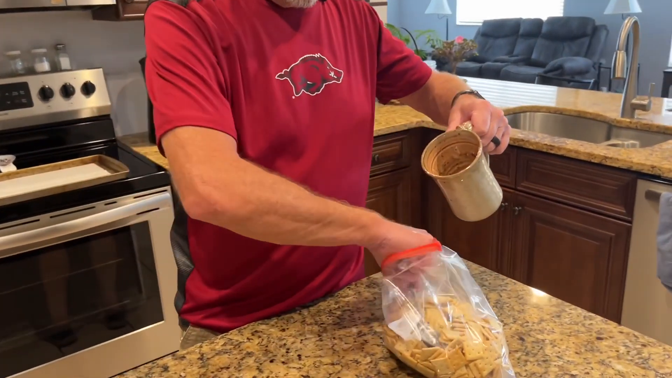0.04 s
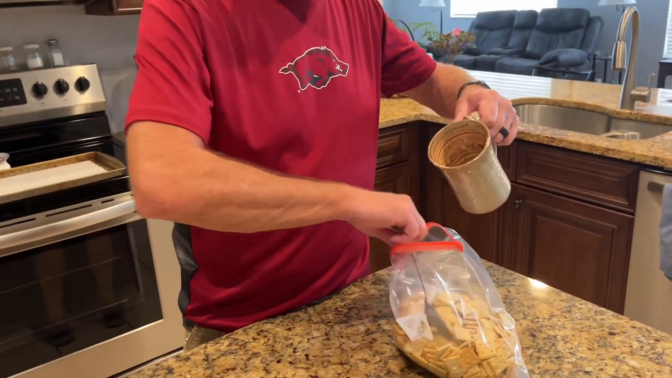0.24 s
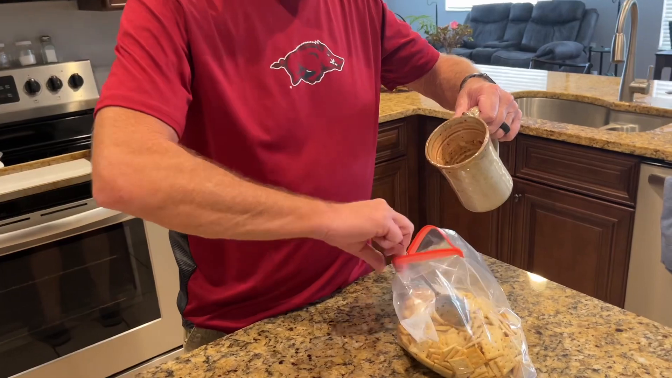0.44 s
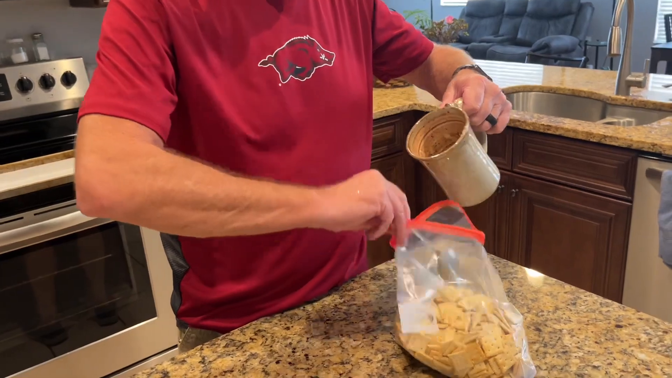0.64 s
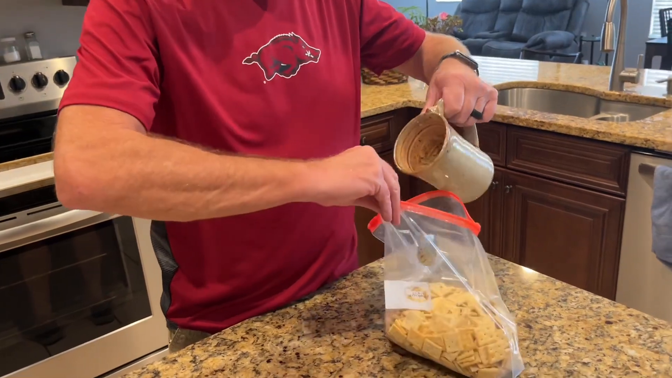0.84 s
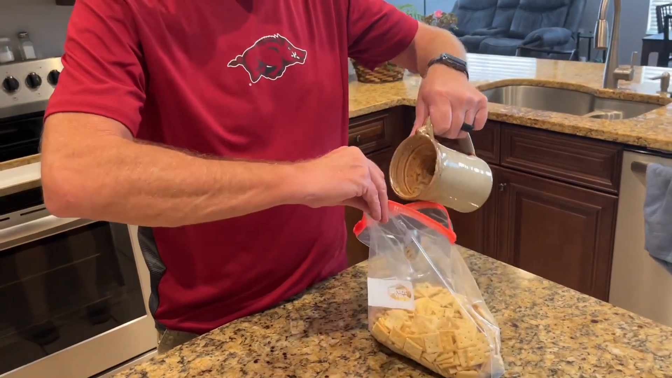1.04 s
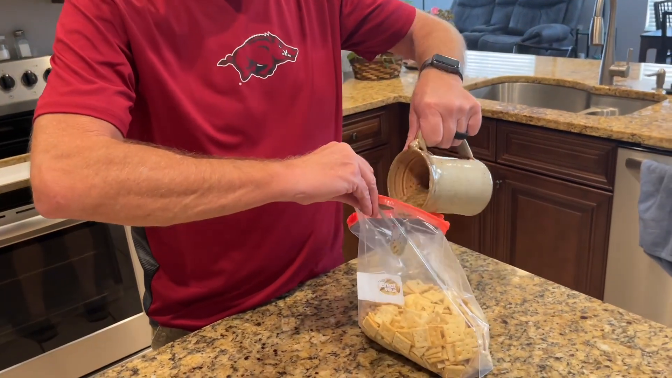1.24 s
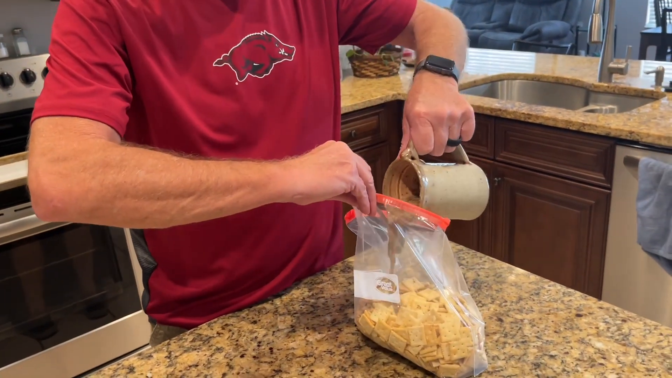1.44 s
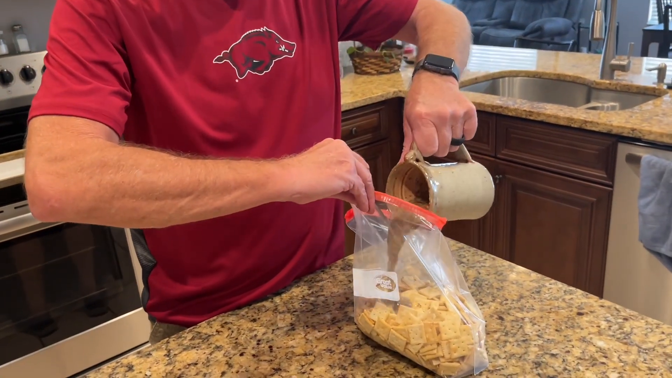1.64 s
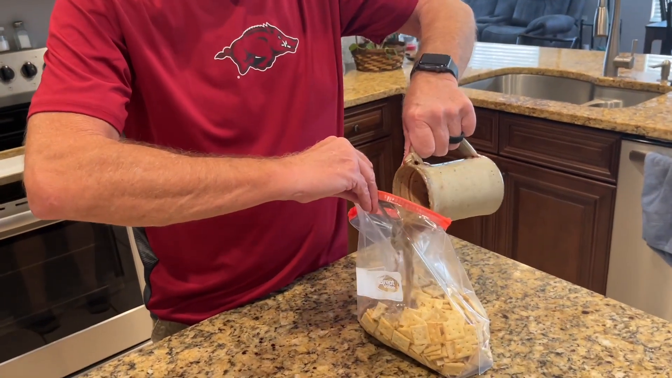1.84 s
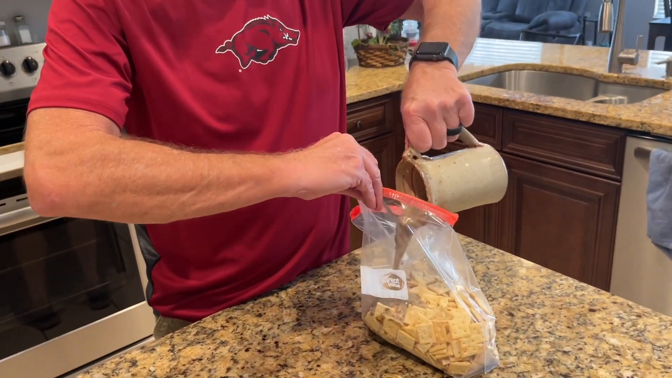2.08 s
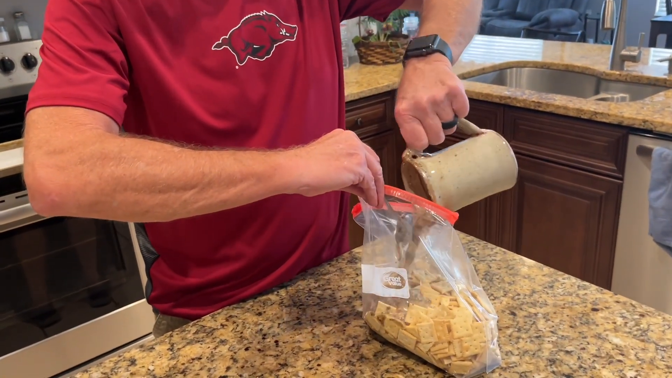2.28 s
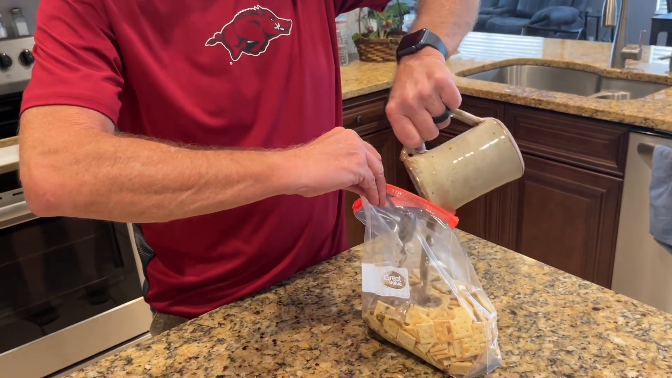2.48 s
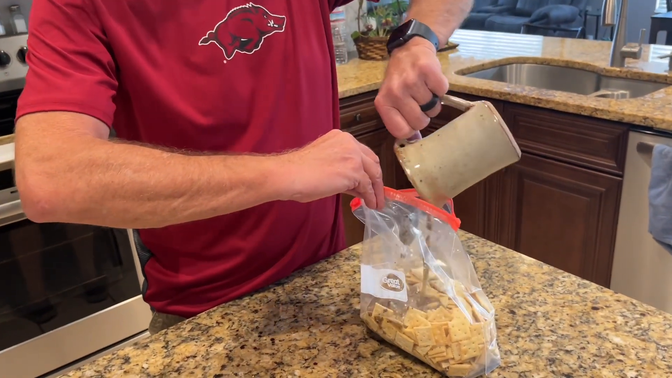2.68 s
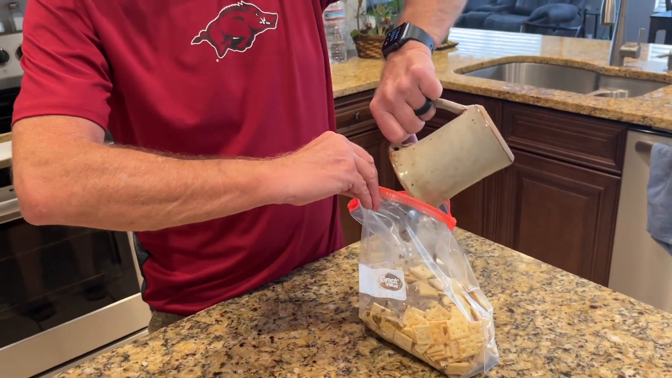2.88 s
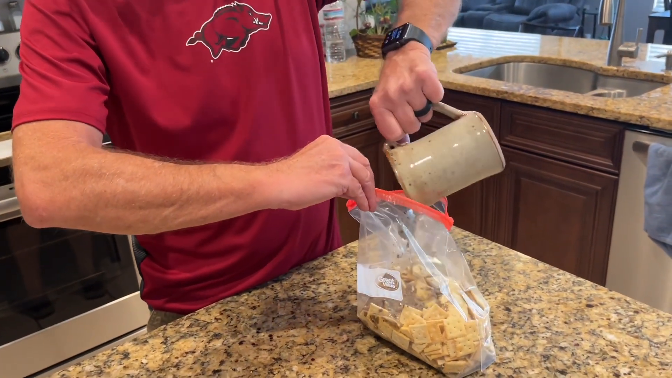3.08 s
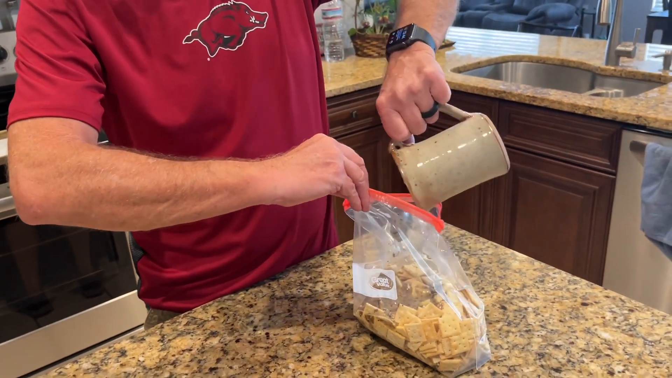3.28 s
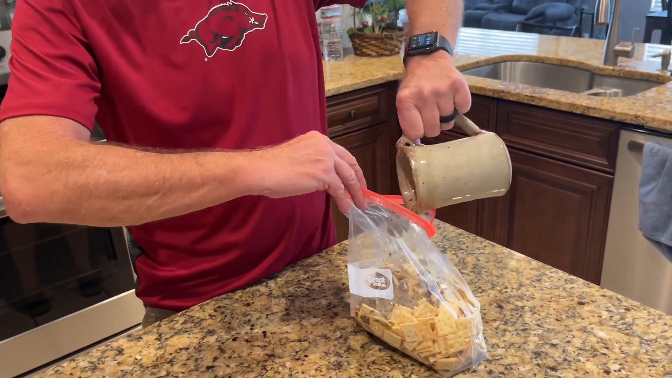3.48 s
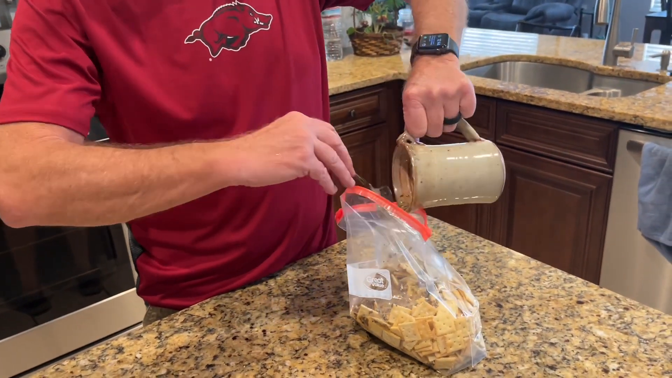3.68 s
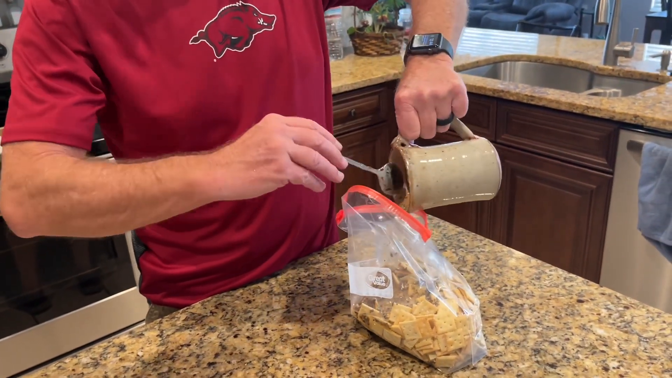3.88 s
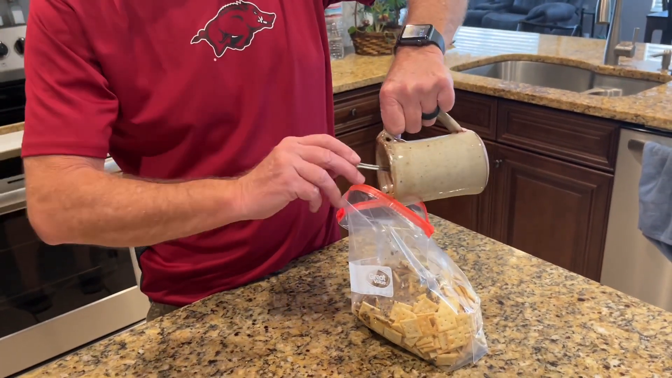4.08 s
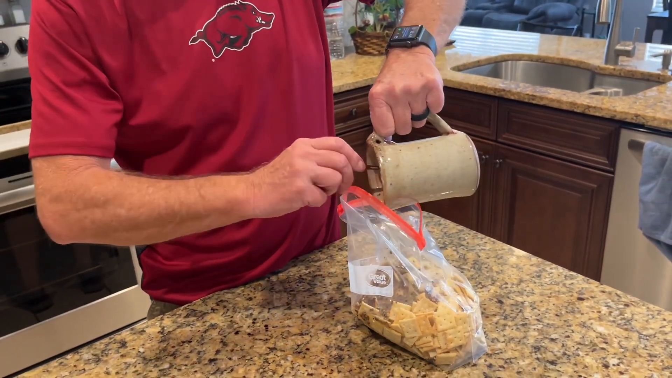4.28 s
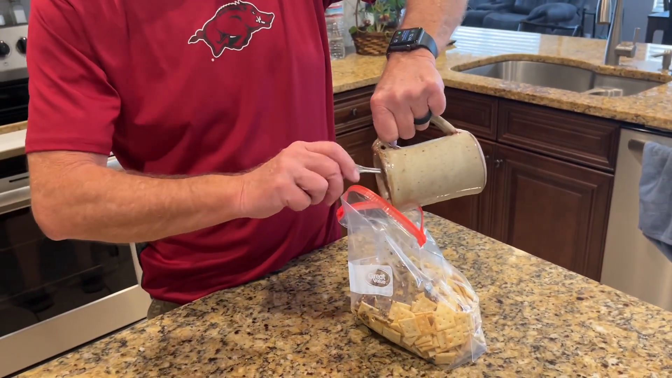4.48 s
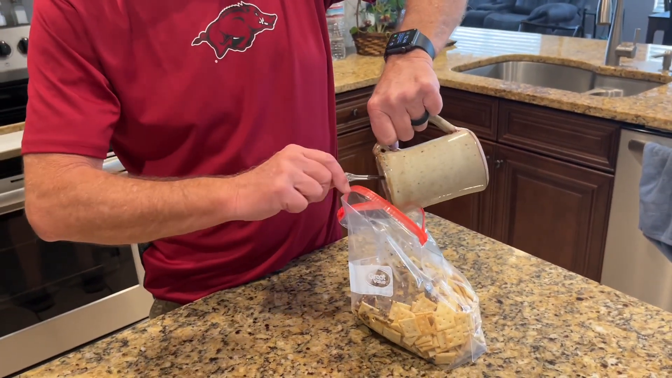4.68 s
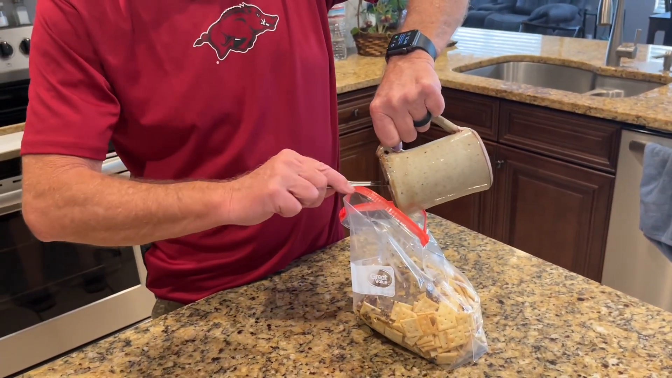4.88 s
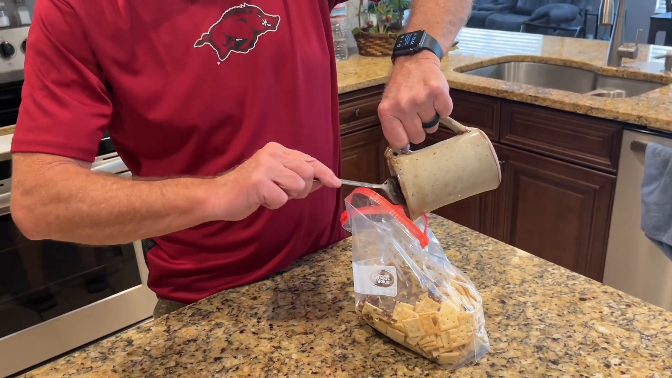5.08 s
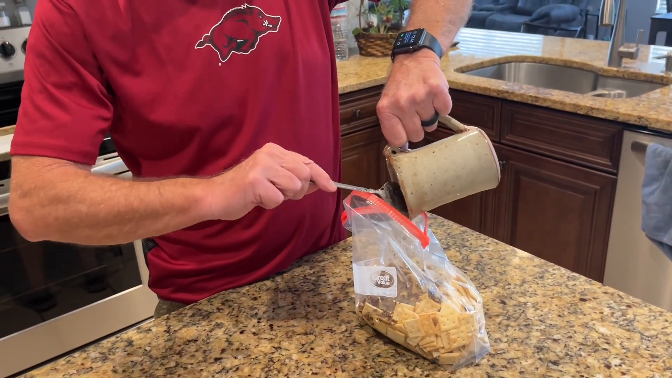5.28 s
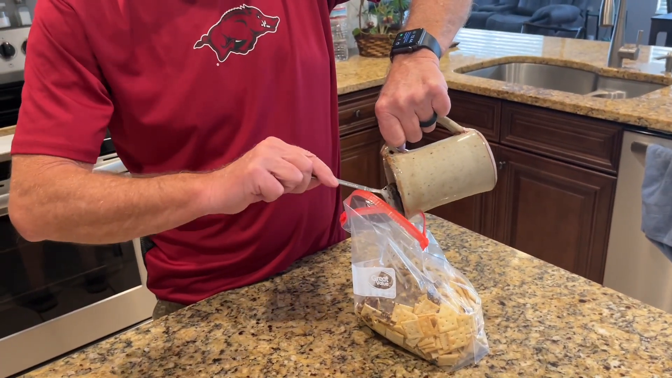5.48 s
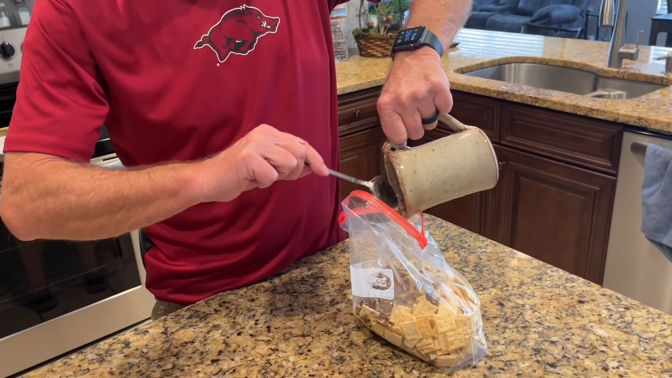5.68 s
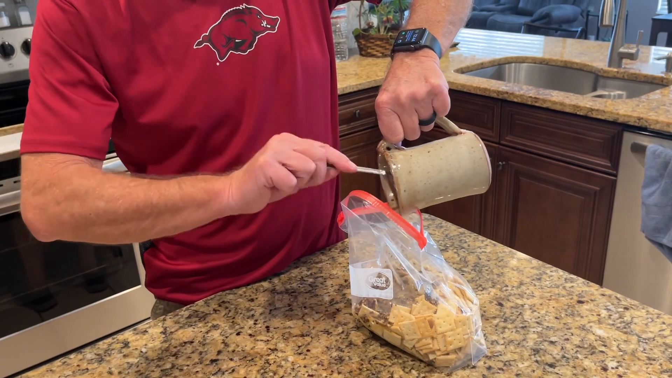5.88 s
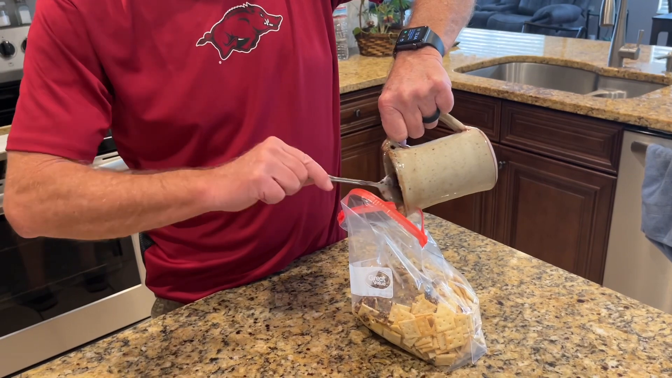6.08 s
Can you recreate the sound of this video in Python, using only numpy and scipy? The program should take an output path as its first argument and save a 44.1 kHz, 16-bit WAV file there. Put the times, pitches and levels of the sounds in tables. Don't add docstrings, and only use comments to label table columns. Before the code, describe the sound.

Thin plastic film rustles and pops first, crackers shifting dully inside, then calms to isolated ticks. Later a steel spoon works in a stoneware mug: about six hard, short-ringing knocks at uneven spacing, the fourth loudest, joined by grinding scrapes and tiny squeaks. The sound is close and dry over a stone counter, heard by a phone, with light kitchen reverberation, soft hiss, low rumble and appliance hum.

```python
import sys
import numpy as np
from scipy import signal
from scipy.fft import rfft, irfft, next_fast_len
from scipy.io import wavfile
from scipy.ndimage import uniform_filter1d

SR = 44100
rng = np.random.default_rng(int(sys.argv[2]) if len(sys.argv) > 2 else 0)


def voltage_ratio(decibels):
    exponent = np.asarray(decibels, float) / 20
    return 10 ** exponent


def to_wav(s):
    ch = np.atleast_2d(s).T
    pcm = np.round(np.clip(ch, -1, 1) * 32767)
    wavfile.write(sys.argv[1], SR, pcm.astype(np.int16))


N = 270538

# (frequency [Hz], likeness [0-1])
ALIKE = [(100, .95), (500, .78), (850, .12), (1100, .35), (1450, .15), (1900, .75), (3500, .65), (4800, .3),
         (6800, .66), (7800, .997), (8900, .997), (9700, .8), (10600, .997), (13300, .997), (14000, .8),
         (15200, .97)]
# (frequency [Hz], level [dB])
FILM_COLOUR = [(600, -5), (1500, -6.5), (3000, -1.5), (5000, -5.5), (8000, -9.5), (12000, -10),
               (14500, -22), (16500, -32.5)]
# (frequency [Hz], level [dB])
TICK_COLOUR = [(3000, -23), (6000, -5), (9000, -8.5), (12000, -6.5), (15000, -6), (16800, -28)]
# (frequency [Hz], level [dB])
GRIT_COLOUR = [(500, -25.5), (1200, -10), (2500, -6), (4500, -5), (6500, -13), (8300, -19.5), (10000, -19),
               (12600, -33), (13600, -46), (16000, -43)]
# (time [s], peak level [dB], fold ring [Hz], fizz against the ring [dB])
OPENING_SNAPS = [(0.0846, -38.5, 2680, -19), (0.212, -51, 3700, -13), (0.4233, -36.5, 2430, 11.5),
                 (0.4428, -40, 2570, 1), (0.4505, -33.5, 4500, 9), (0.52, -46.5, 3340, -37),
                 (0.581, -41, 3200, -10), (0.598, -39, 2200, -1), (0.6104, -37, 3150, -18),
                 (0.6233, -28.5, 3020, -10), (0.638, -36, 2440, -27), (0.66, -40, 1110, -13),
                 (0.678, -32.5, 1300, -26), (0.693, -26.5, 1860, 19), (0.71, -40, 990, -25),
                 (0.734, -36, 1110, -21), (0.75, -35, 1380, -21), (0.997, -45, 1380, -28),
                 (1.0158, -41.5, 2400, -14), (1.042, -38.5, 3120, -30)]
# (time [s], peak level [dB], fold ring [Hz], fizz against the ring [dB])
HOLDING_SNAPS = [(1.259, -36.5, 3600, 2), (1.3856, -43.5, 3960, -11), (1.5794, -47, 3000, -22),
                 (1.668, -51, 11200, 1), (1.7334, -44.5, 1330, 12), (1.9476, -35, 1750, -34),
                 (2.0884, -48, 1180, -25), (2.089, -43.5, 2600, -25), (3.683, -47, 10800, 9),
                 (2.479, -52.5, 1460, 19), (2.531, -41, 1840, 4), (2.612, -41.5, 3370, -7),
                 (2.72, -54, 2500, -20), (2.879, -53, 2400, -20), (2.859, -52, 3450, -18),
                 (2.917, -50, 1210, 9), (2.984, -46.5, 1520, -19), (3.0576, -42, 2410, -32),
                 (3.224, -50, 3340, 2), (3.339, -51.5, 3100, -11), (3.4204, -38.5, 3300, 1),
                 (3.457, -44.5, 3300, -29), (3.4692, -40, 11300, 9), (3.608, -50, 3560, -4),
                 (3.623, -32.5, 4870, 8.5), (3.651, -43, 1890, 1), (3.672, -43, 3150, -34),
                 (3.701, -42, 1580, 7), (3.825, -46.5, 3730, -32), (3.8632, -37.5, 6600, 2),
                 (4.107, -49.5, 2720, -31), (4.122, -48.5, 3180, -39), (4.193, -45, 3400, -31)]
FIRST_TOUCH = 3.5


def evened(x):
    return x / np.sqrt(np.mean(x ** 2) + 1e-20)


def peaked(x, db):
    return voltage_ratio(db) * x / abs(x).max()


def read(points, hz):
    f, value = np.transpose(points)
    return np.interp(np.log(hz + 1), np.log(f + 1), value)


def add(mix, s, sound):
    part = mix[round(s * SR):][:len(sound)]
    part += sound[:len(part)]


def shaped(x, gain):
    size = next_fast_len(x.shape[-1] + 1024)
    spectrum = rfft(x, size) * gain(np.fft.rfftfreq(size, 1 / SR))
    return irfft(spectrum, size)[..., :x.shape[-1]]


def coloured(x, points):
    log_gain = np.log(voltage_ratio(read(points, abs(np.fft.fftfreq(4096, 1 / SR)))))
    taps = np.fft.ifft(np.exp(np.conj(signal.hilbert(log_gain)))).real[:1024]
    return signal.oaconvolve(x, taps / np.linalg.norm(taps))[:len(x)]


def resonate(x, hz, width_hz):
    turn = np.exp(2j * np.pi * np.cumsum(hz * np.ones(len(x))) / SR)
    r = np.exp(-np.pi * width_hz / SR)
    return 2 * (turn * signal.lfilter([1 - r], [1, -r], x / turn)).real


def grains(count, per_s, spread_db):
    size_db = spread_db * np.minimum(rng.exponential(1, count), 5)
    size = voltage_ratio(size_db) * rng.choice([-1, 1], count)
    return size * (rng.random(count) < per_s / SR)


def diffuse(pair):
    def same(hz):
        return np.clip(read(ALIKE, hz), 0, 1)

    shared = shaped(pair[0], same)
    own = shaped(pair[1], lambda hz: np.sqrt(1 - same(hz) ** 2))
    return np.array([pair[0], shared + own])


def room_air():
    # (frequency [Hz], level [dB])
    air_colour = [(20, -38), (60, -9.5), (200, 8), (450, 4), (700, -2), (1200, -7), (2500, -19.5),
                  (5000, -18), (8000, -25.5), (12000, -23.5), (14200, -22), (15500, -55)]
    noise = rng.standard_normal((2, N))
    return voltage_ratio(-63) * evened(shaped(noise, lambda hz: voltage_ratio(read(air_colour, hz))))


def house_rumble():
    # (time [s], level [dB])
    rumble_level = [(0.0, -74.5), (0.65, -66), (0.9, -69.5), (1.6, -73), (3.7, -72), (4.0, -77.5),
                    (4.75, -91), (5.739, -66), (6.13, -75.5)]
    swell_db, swells_per_s = 1.5, 0.5
    noise = rng.standard_normal((2, N))
    low = evened(shaped(noise, lambda hz: (hz / 65) ** 2 / (1 + (hz / 65) ** 5)))
    swell = evened(shaped(noise[0], lambda hz: 1 / (1 + (hz / swells_per_s) ** 2)))
    level_db = np.interp(np.arange(N) / SR, *np.transpose(rumble_level))
    return voltage_ratio(level_db + swell_db * swell) * low


def refrigerator():
    # (frequency [Hz], level [dB])
    hum_tones = [(181.7, -70), (363.4, -65), (454.6, -71), (651.4, -81), (769.8, -94), (828.5, -80)]
    steady_share = .38
    turn = 2 * np.pi * np.arange(N) / SR
    noise = rng.standard_normal((2, N))
    hum = np.zeros((2, N))
    for hz, db in hum_tones:
        steady = np.sqrt(2) * np.sin(hz * turn)
        wavering = evened(shaped(noise, lambda f: 1 / (1 + ((f - hz) / 10) ** 2)))
        hum += voltage_ratio(db) * evened(steady_share * steady + (1 - steady_share) * wavering)
    return hum


def electronics():
    # (frequency [Hz], level [dB])
    whine_tones = [(3591, -86.5), (5200, -89.5), (3268, -95), (4479, -95)]
    turn = 2 * np.pi * np.arange(N) / SR
    sway = 3 * np.sin(1.3 * turn)
    return sum(voltage_ratio(db) * np.sqrt(2) * np.sin(hz * turn + sway) for hz, db in whine_tones)


def background():
    return diffuse(room_air() + house_rumble() + refrigerator() + electronics())


def kitchen(x):
    # (frequency [Hz], time to fade by 60 dB [s])
    ring_times = [(250, 0.92), (1000, 0.85), (3000, 0.52), (7000, 0.59), (14000, 0.33)]
    gap_s = 0.0022
    taps = np.zeros((2, SR))
    at = np.arange(0, SR - 20, 20) + rng.integers(0, 20, (2, (SR - 1) // 20))
    np.put_along_axis(taps, at, rng.choice([-1., 1.], at.shape), 1)
    hz, t, z = signal.stft(taps, SR, nperseg=256)
    fading = voltage_ratio(-60 * t / read(ring_times, hz)[:, None])
    tail = signal.istft(z * fading, SR, nperseg=256)[1]
    tail *= np.clip(np.arange(tail.shape[1]) / SR / gap_s - .5, 0, 1)
    tail /= np.linalg.norm(tail[0])
    return diffuse(signal.fftconvolve(x[None], tail, axes=1)[:, :N])


def near(x):
    # (delay [s], level [dB])
    counter_echo = [
        (.0005, -16.5),
        (.0012, -14.5),
    ]
    scatter_db, scatter_s = -7, .006
    pair = np.array([x + voltage_ratio(db) * np.roll(x, round(s * SR)) for s, db in counter_echo])
    taps = rng.standard_normal(1024) * np.exp(-np.arange(1024) / SR / scatter_s)
    scattered = signal.oaconvolve(x, taps / np.linalg.norm(taps))[:N]
    scattered = shaped(scattered, lambda hz: np.sqrt(1 - read(ALIKE, hz) ** 2))
    return pair + voltage_ratio(scatter_db) * np.array([scattered, -scattered])


def bag():
    # (time [s], level [dB])
    grip = [(0.0, -60), (0.13, -63.5), (0.24, -55.5), (0.4, -63), (0.55, -61.5), (0.69, -45), (0.85, -65.5),
            (0.95, -71), (1.02, -57.5), (1.2, -68.5), (2.6, -68.5), (4.2, -83)]
    # (time [s], level [dB])
    settling = [
        (4.2, -76),
        (4.592, -66.5),
        (5.94, -97),
        (6.134, -77),
    ]
    # (frequency [Hz], level [dB])
    tumble_colour = [(50, -7.5), (100, -7.5), (300, 1), (700, -7), (1300, -5), (2500, -16.5), (5000, -30)]
    after_db, after_db_per_s = -25.5, 231
    tumble_db, tumble_share, shaken_db = -2, 1.51, -7
    t = np.arange(N) / SR
    grip_db = np.interp(t, *np.transpose(grip), right=-120)
    after = np.zeros(N)
    for s, db, *_ in HOLDING_SNAPS + OPENING_SNAPS:
        add(after, s, voltage_ratio(db + after_db - after_db_per_s * t[:SR // 4]) ** 2)
    clumps = voltage_ratio(3 * evened(uniform_filter1d(rng.standard_normal(N), 300)))
    crackle = evened(coloured(clumps * grains(N, 4000, 2.65), FILM_COLOUR))
    tumble = evened(coloured(np.sqrt(clumps) * grains(N, 2000, 2.7), tumble_colour))
    hardest_db = grip_db.max()
    rolling = voltage_ratio(hardest_db + tumble_db + tumble_share * (grip_db - hardest_db))
    shaken = voltage_ratio(shaken_db) * np.sqrt(after)
    settled = voltage_ratio(np.interp(t, *np.transpose(settling), left=-120) + 0.5)
    crackle_gain = np.sqrt(voltage_ratio(grip_db - 5.0) ** 2 + after)
    return crackle_gain * crackle + (rolling + shaken + settled) * tumble


def snap(peak_db, hz, fizz_db):
    # (multiple of its pitch [1], level [dB])
    fold_rings = [(1, -11), (2.08, -11), (2.98, -12)]
    t = np.arange(SR // 16) / SR
    burst = rng.standard_normal(len(t)) * np.exp(-t / 0.0015) * 1.01 + FIRST_TOUCH * (t == 0)
    pop = peaked(resonate(burst, hz, 800), -2) + peaked(coloured(burst, FILM_COLOUR), -5)
    thin = sum(peaked(resonate(burst, k * hz, 200), db) for k, db in fold_rings if k * hz < SR / 4)
    fizz = peaked(coloured(burst, TICK_COLOUR), fizz_db - 2)
    return peaked(pop + thin + fizz, peak_db)


def snaps():
    out = np.zeros(N)
    for s, *row in HOLDING_SNAPS + OPENING_SNAPS:
        add(out, s, snap(*row))
    return out


def click(peak_db, hz, t60, colour, bare_db):
    t = np.arange(SR // 8) / SR
    burst = rng.standard_normal(len(t)) * np.exp(-t / 0.0025) + FIRST_TOUCH * (t == 0)
    ring = peaked(resonate(burst, hz, 5.8 / max(t60, .001)), 0)
    return peaked(ring + peaked(coloured(burst, colour), bare_db), peak_db)


def nicks():
    # (time [s], peak level [dB], ring [Hz], time to fade by 60 dB [s])
    grain_ticks = [(4.3268, -40, 9100, .05), (4.3284, -49, 10500, .04), (4.41, -54, 9600, .03),
                   (4.58, -42, 9550, .03), (4.592, -40, 13500, .03), (4.862, -53, 6900, .02),
                   (5.733, -60, 13000, 0.019), (5.823, -58, 13500, .02), (5.98, -48, 12500, .02),
                   (6.027, -54, 12400, .03)]
    out = np.zeros(N)
    for s, db, hz, t60 in grain_ticks:
        add(out, s, click(db, hz, t60, TICK_COLOUR, bare_db=2))
    return out


def squeak(length_s, first_hz, last_hz, db, width_hz):
    waver, stutter_db = .005, 2.5
    u = np.arange(round(length_s * SR)) / (length_s * SR)
    rub, *tremor = rng.standard_normal((3, SR // 4))
    smooth = [uniform_filter1d(uniform_filter1d(v, size=300), size=300) for v in tremor]
    drift, stutter = (evened(v)[:len(u)] for v in smooth)
    hz = (first_hz + (last_hz - first_hz) * u) * (1 + waver * drift)
    tone = resonate(rub[:len(u)], hz, 1.4 * width_hz)
    tone = resonate(tone, hz, 1.4 * width_hz)
    steady = tone / np.sqrt(uniform_filter1d(tone ** 2, 600) + 0.15 * np.mean(tone ** 2))
    start_and_end = np.minimum(np.minimum(u * length_s / .003, (1 - u) / .4), 1)
    return voltage_ratio(db) * evened(steady * voltage_ratio(stutter_db * stutter)) * start_and_end


def singing():
    # (start [s], length [s], first pitch [Hz], last pitch [Hz], level [dB])
    squeaks = [(4.24, 0.038, 2560, 2620, -49), (4.262, 0.066, 2400, 2840, -56),
               (4.247, 0.05, 2020, 2100, -54), (4.239, 0.018, 4930, 4900, -48.5),
               (4.339, 0.038, 2830, 2870, -46), (4.315, .03, 4100, 3800, -58),
               (4.342, 0.067, 3760, 3690, -53), (4.38, .07, 2600, 2780, -65),
               (4.458, 0.05, 3215, 3205, -50), (4.515, 0.033, 3200, 3197, -47),
               (4.565, 0.022, 1700, 1500, -54), (4.588, 0.021, 2745, 2630, -44.5),
               (4.59, 0.025, 3840, 3800, -48), (4.591, 0.044, 1800, 1820, -52.5),
               (4.665, 0.073, 2840, 2900, -64), (4.596, 0.12, 4700, 4680, -68),
               (4.911, 0.065, 3000, 2800, -57.5), (4.933, 0.13, 1640, 1900, -62),
               (4.946, 0.12, 2600, 2500, -58), (5.214, 0.045, 1570, 2000, -67),
               (5.25, 0.019, 5970, 5900, -54), (5.51, 0.054, 3600, 4400, -46),
               (5.512, 0.13, 1760, 2030, -62), (5.876, 0.013, 1670, 1650, -72),
               (5.994, 0.079, 1820, 1960, -52), (6.03, 0.08, 1946, 1956, -56.5),
               (6.003, 0.095, 1630, 1644, -59.5), (5.986, 0.036, 2850, 3100, -56),
               (6.6, .04, 2950, 2850, -57), (6.06, 0.016, 3280, 3540, -51),
               (6.028, 0.028, 3600, 3900, -50.5), (6.044, 0.029, 2880, 3030, -45)]
    # (start [s], length [s], first pitch [Hz], last pitch [Hz], level [dB])
    more_squeaks = [(4.236, 0.025, 4020, 4330, -52), (4.238, .03, 3550, 3570, -58),
                    (4.327, 0.028, 5550, 5530, -57), (4.385, 0.028, 5060, 4800, -60),
                    (4.57, 0.018, 4450, 4750, -50.5), (4.546, 0.029, 5400, 5750, -54),
                    (4.547, .02, 4400, 4540, -54), (4.569, 0.013, 2900, 2740, -47),
                    (4.904, 0.026, 4830, 4840, -52), (4.905, 0.022, 5950, 5930, -66),
                    (4.964, 0.051, 5960, 5850, -61.5), (4.924, .11, 4770, 4670, -64),
                    (4.952, 0.13, 3610, 3500, -63.5), (4.99, .03, 4980, 5100, -65), (5.2, .05, 4050, 3950, -59),
                    (5.274, 0.084, 4120, 3970, -63), (5.2, 0.057, 2770, 2700, -53),
                    (5.931, 0.04, 3520, 3750, -68), (5.955, 0.017, 6140, 5900, -58),
                    (5.908, .035, 5600, 5630, -70), (5.955, .02, 4600, 4650, -68),
                    (6.004, 0.0087, 4700, 4650, -58), (5.969, 0.026, 5130, 5070, -62),
                    (5.98, 0.031, 3560, 3500, -58), (6.022, .018, 5900, 5240, -48.5),
                    (6.025, 0.015, 4030, 4200, -55), (6.049, 0.03, 3410, 3520, -52),
                    (6.049, 0.028, 4760, 4760, -52), (6.095, .03, 4760, 5200, -58.5)]
    out = np.zeros(N)
    for s, length_s, first_hz, last_hz, db in squeaks + more_squeaks:
        width_hz = 12 + .4 * abs(last_hz - first_hz)
        add(out, s, squeak(length_s, first_hz, last_hz, db, width_hz))
    return out


def stroke(top_s, build_s, db, fade_db_per_s, edge_db):
    build_db, spent_db = 17.5, 43
    t = np.arange(-build_s, spent_db / max(fade_db_per_s, 20), 1 / SR)[:SR * 3 // 4]
    grit = evened(coloured(grains(SR * 3 // 4, 9000, 2.5)[:len(t)], GRIT_COLOUR))
    grit = shaped(grit, lambda hz: voltage_ratio(edge_db / (1 + (8500 / (hz + 1)) ** 8)))
    press_db = np.where(t < 0, build_db * t / build_s, -fade_db_per_s * t)
    return top_s - build_s, voltage_ratio(db + press_db - 10.0) * grit


def tap(peak_db, crack_ms, hard_db, crack_db, rings):
    # (frequency [Hz], level [dB])
    crack_colour = [(250, -16), (600, -43), (1500, -9), (2300, 5.5), (4000, 4.5), (7000, 4), (8300, -4),
                    (10000, 0.5), (13000, -18), (14500, -23), (16500, -45)]
    rise_ms, blow = .4, 2.5
    t = np.arange(SR // 4) / SR
    chatter = rng.standard_normal(len(t)) * np.exp(-1000 * t / crack_ms)
    chatter *= np.minimum(1000 * t / rise_ms, 1)
    chatter[round(rise_ms * SR / 1000)] += blow
    modes = np.zeros(len(t))
    for k, (hz, width_hz, db) in enumerate(rings):
        mode = evened(resonate(chatter, hz, max(width_hz, 30)))
        modes += (-1) ** k * voltage_ratio(db) * np.sqrt(width_hz) * mode
    crack = evened(coloured(chatter, crack_colour))
    body = peaked(evened(modes) + voltage_ratio(crack_db) * crack, 0)
    bright = peaked(coloured(chatter, TICK_COLOUR), hard_db + 10.5)
    return peaked(body + bright, peak_db)


def spoon():
    # (time [s], peak level [dB], crack length [ms], bright tick [dB], bare crack [dB])
    blows = [
        (4.2353, -21.5, 2.37, -16, -6.5),
        (4.4572, -16.5, 2, -13.5, -9.5),
        (4.901, -25, 2.04, -18.5, -12),
        (5.1925, -13.5, 2.4, -28.5, -4),
        (5.499, -20.5, 3.9, -26, -14),
        (5.8497, -32.5, 3.3, -34, -21),
    ]
    # (frequency [Hz], width [Hz], level [dB])
    blow_rings = [
        [(1150, 300, -14), (2420, 80, 1), (2200, 60, -12), (2660, 90, 5), (3500, 60, -8), (4200, 120, -5),
         (5000, 40, -3), (8900, 300, -12)],
        [(690, 50, -7), (460, 80, -14), (820, 60, -13), (1300, 100, -15), (1835, 120, -12), (3220, 60, 2),
         (4390, 150, -9), (5500, 150, -10), (5900, 150, -10), (6550, 250, -2), (7000, 150, -5),
         (10050, 200, -6), (12800, 300, -11), (14000, 300, -11)],
        [(1100, 300, -12), (2100, 150, -8), (2950, 100, -4), (4000, 200, -4), (4680, 100, -2), (5000, 80, 1),
         (5900, 150, -4), (7400, 200, -9), (9000, 300, -9), (9900, 300, -10)],
        [(750, 200, -22), (1595, 110, 3), (2366, 100, -8), (2890, 150, 0), (3312, 120, 0), (3610, 120, -1),
         (4056, 130, 0), (4930, 120, -5), (5230, 100, -5), (5650, 150, -7), (6750, 200, -4), (7570, 120, -9),
         (9790, 200, -15), (11900, 250, -15)],
        [(1705, 100, 6), (2750, 100, -5), (2940, 150, 0), (3740, 120, -2), (4270, 150, -4), (5120, 150, -10),
         (5660, 100, -8), (6440, 100, -3), (7300, 150, -17), (9900, 200, -14), (11600, 200, -13),
         (12300, 150, -6), (13200, 200, -14)],
        [(400, 180, 8), (700, 200, 3), (1100, 250, 5), (1650, 110, 12), (3150, 150, -10), (4020, 140, -9),
         (5640, 130, -5)],
    ]
    # (time [s], peak level [dB], ring [Hz], time to fade by 60 dB [s])
    slips = [(4.2237, -45, 6900, 0.02), (4.3275, -28, 2770, 0.07), (4.522, -44, 3120, 0.082),
             (4.566, -29.5, 4550, 0.055), (4.57, -28, 4740, .04), (4.5745, -30, 5030, .04),
             (4.581, -25, 4750, 0.025), (4.5924, -24.5, 2740, 0.04), (4.598, -29, 3870, .04),
             (4.666, -44, 2880, 0.054), (4.709, -40, 4830, 0.052), (4.88, -46, 1630, 0.032),
             (4.938, -51, 6400, .03), (5.822, -62, 6500, 0.014), (5.885, -51, 1640, .04),
             (5.9803, -35.5, 4660, 0.026), (5.9938, -36, 1750, 0.039), (6.0254, -32.5, 3740, 0.04),
             (6.032, -35, 4150, .03), (6.06, -35, 2470, .03), (6.048, -36, 2980, 0.081),
             (6.066, -42, 3500, .04)]
    # (hardest moment [s], build-up [s], grit [dB], fading [dB/s], edge fizz [dB])
    strokes = [(4.245, 0.0076, -42, 123, 12), (4.332, 0.0053, -41.5, 164, 12), (4.395, 0.034, -49, 150, 4),
               (4.469, .01, -39.5, 200, 9), (4.576, 0.044, -40.5, 132, 5), (4.602, 0.014, -35, 498, -7),
               (4.63, 0.012, -51.5, 46, -4), (4.97, 0.075, -41, 143, -0.5), (5.03, 0.033, -65, 74, -15),
               (5.188, 0.025, -47.5, 598, -21), (5.209, 0.012, -37.5, 79, 0),
               (5.519, 0.015, -36.5, 150, -3.5), (5.58, 0.029, -49.5, 55, -4),
               (5.998, 0.11, -46.5, 300, 10), (6.027, 0.0041, -42.5, 150, 6), (6.066, 0.021, -41, 96, 2)]
    out = np.zeros(N)
    for (s, *blow), rings in zip(blows, blow_rings):
        add(out, s, tap(*blow, rings))
    for s, db, hz, t60 in slips:
        add(out, s, click(db - 3, hz, t60, GRIT_COLOUR, bare_db=0))
    for row in strokes:
        add(out, *stroke(*row))
    return signal.sosfilt(signal.butter(3, 330, "high", fs=SR, output="sos"), out)


def scene():
    steel = spoon() + nicks()
    tones = singing()
    plastic = snaps() + bag()
    into_room = voltage_ratio(-8.5) * steel + voltage_ratio(-6.0) * tones + voltage_ratio(-7.5) * plastic
    return near(steel + tones + plastic) + kitchen(into_room) + background()


def roll_off(x):
    return signal.sosfilt(signal.butter(12, 16640, fs=SR, output="sos"), x)


def record(dry):
    # (frequency [Hz], level [dB])
    port_dip = [(7300, -0.5), (7900, 2), (9000, 4), (9700, -1.5), (13500, -2.5), (15000, 3), (16000, -6),
                (16700, -16)]
    # (frequency [Hz], level [dB])
    balance = [(500, .5), (750, 2), (1000, .5), (1400, -1), (1850, 1.5), (2700, .7), (4800, 2.5),
               (6200, -.5), (7600, 0)]
    # (frequency [Hz], phase [rad])
    right_lead = [(60, -.1), (400, -.45), (700, -1.0), (1000, 0), (1450, .45), (2000, -.1), (2800, -.5),
                  (4100, -.5), (5500, 1.3), (6800, 1.2), (7800, 3.06), (8900, 3.24), (10600, 6.0),
                  (12000, 6.28), (13300, 6.6), (14800, 9.3), (16400, 11.6)]
    dry = signal.sosfilt(signal.butter(3, 55, "high", fs=SR, output="sos"), dry)
    dry = shaped(dry, lambda hz: voltage_ratio(read(port_dip, hz)))
    left = shaped(dry[0], lambda hz: voltage_ratio(read(balance, hz) / 2))
    right = shaped(dry[1], lambda hz: voltage_ratio(-read(balance, hz) / 2) * np.exp(1j * read(right_lead, hz)))
    return roll_off(np.array([left, right]))


dry = scene()
out = record(dry)
to_wav(out)
```